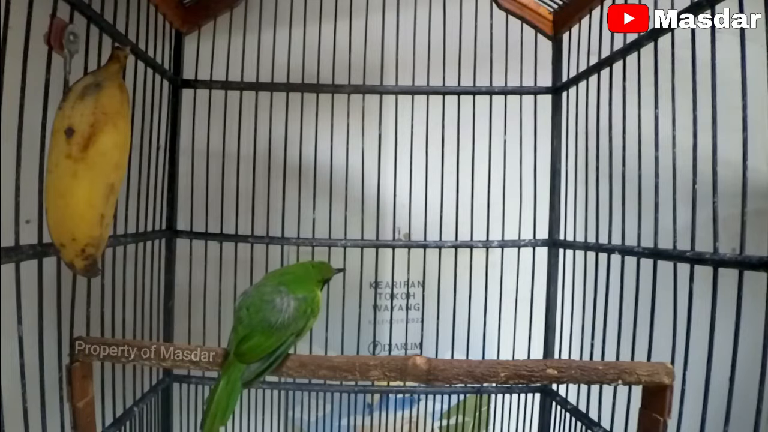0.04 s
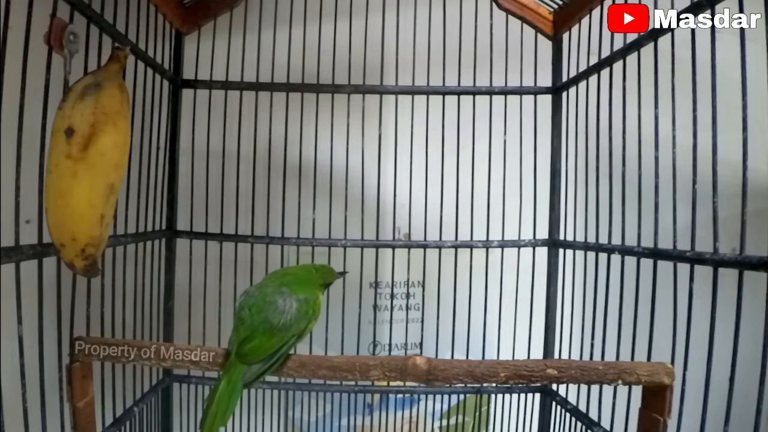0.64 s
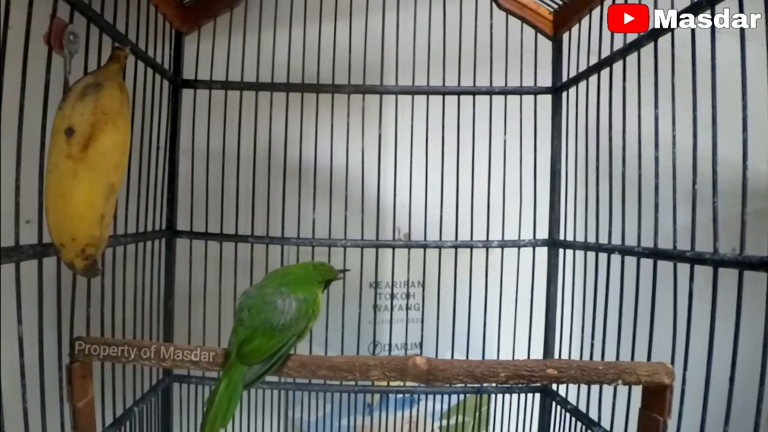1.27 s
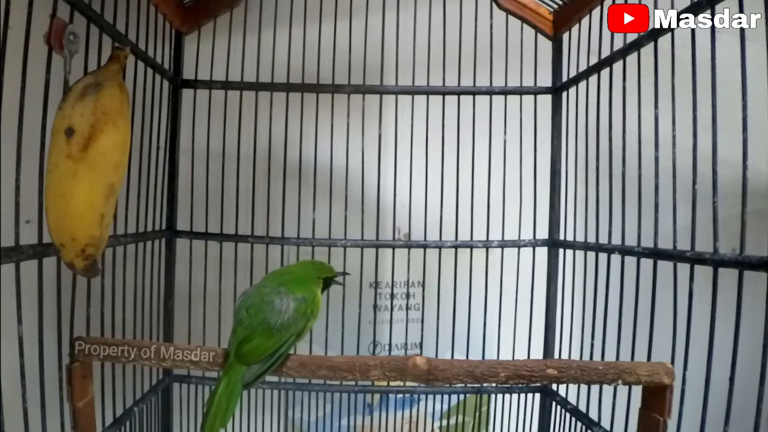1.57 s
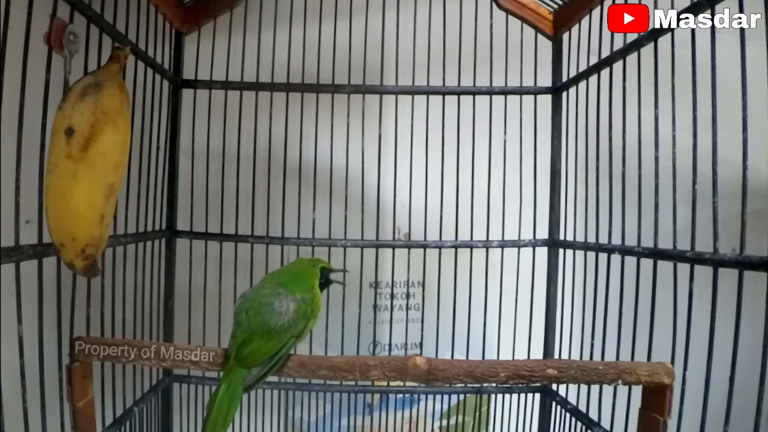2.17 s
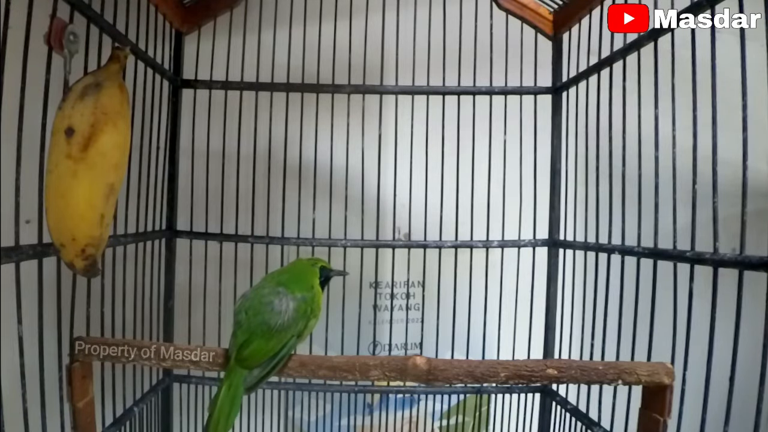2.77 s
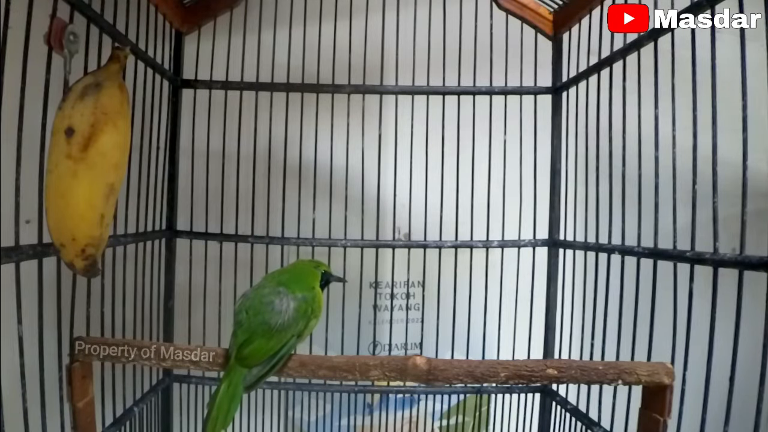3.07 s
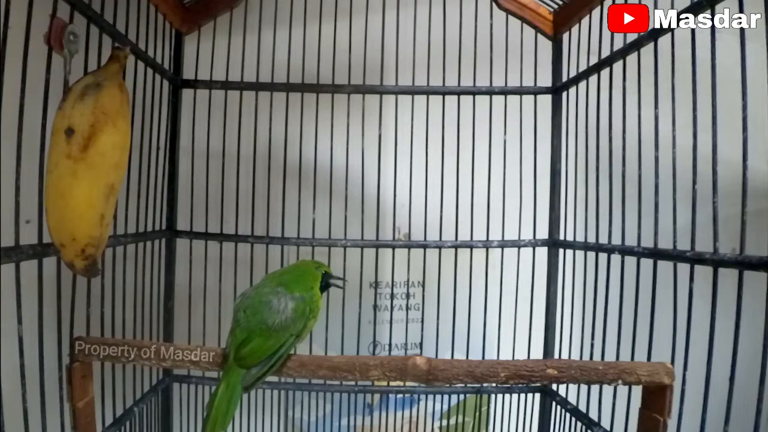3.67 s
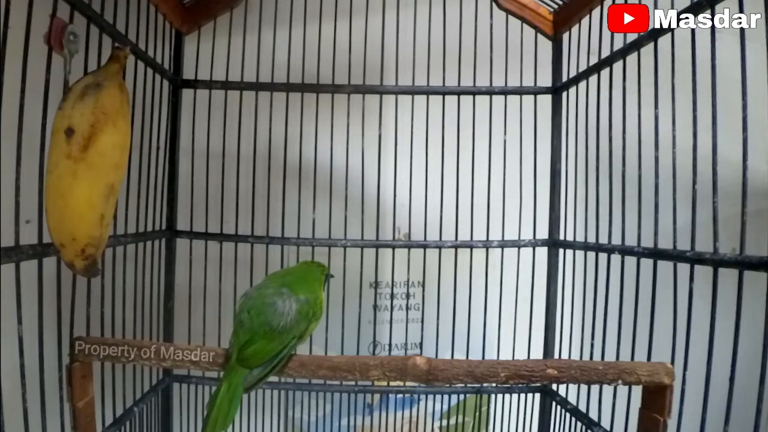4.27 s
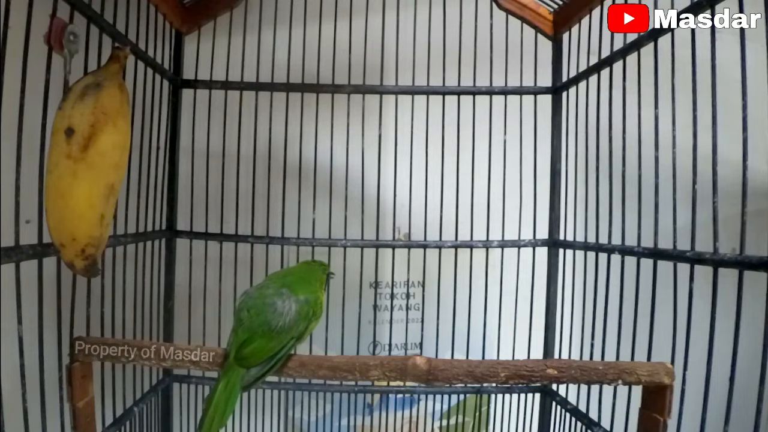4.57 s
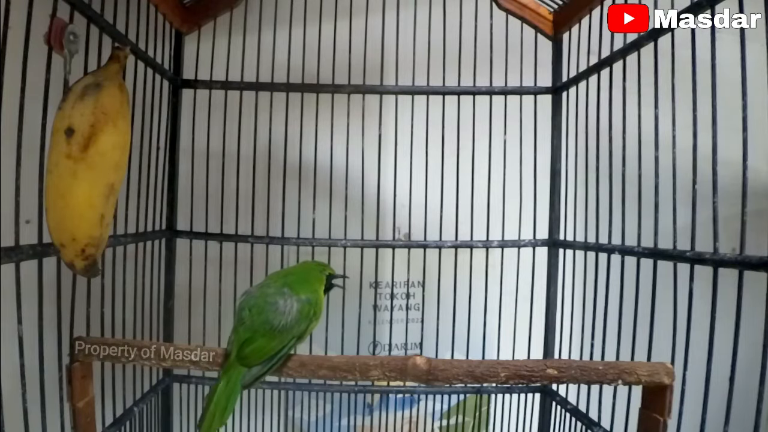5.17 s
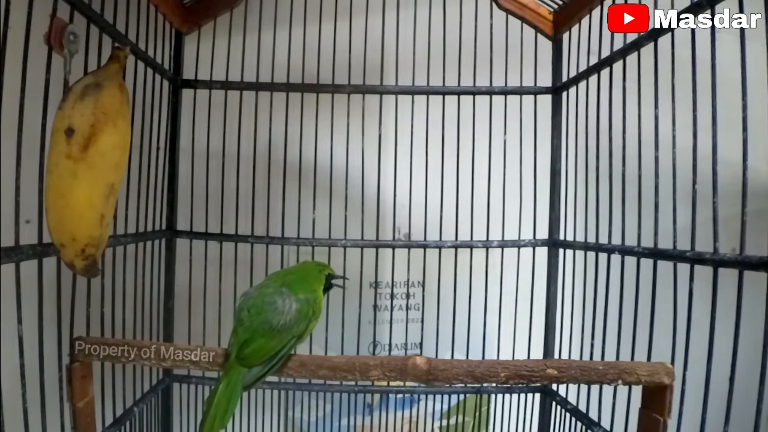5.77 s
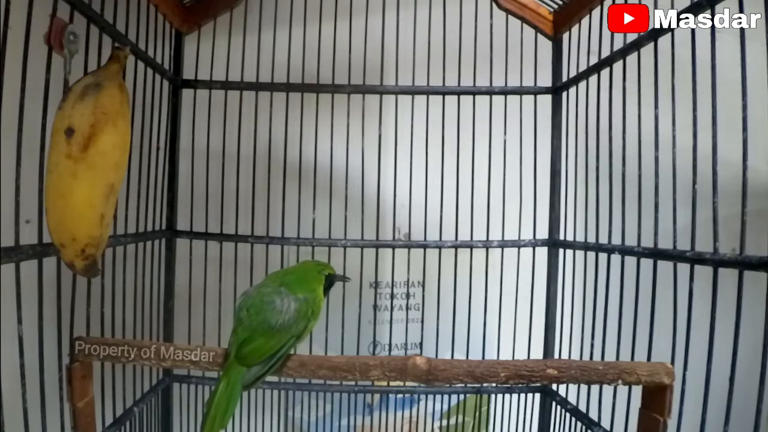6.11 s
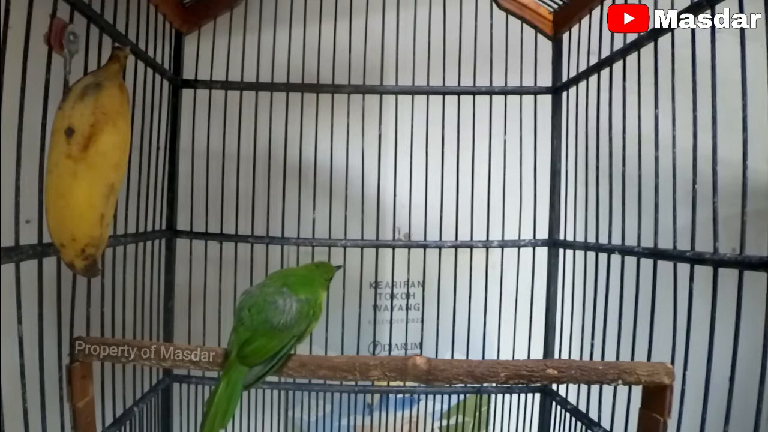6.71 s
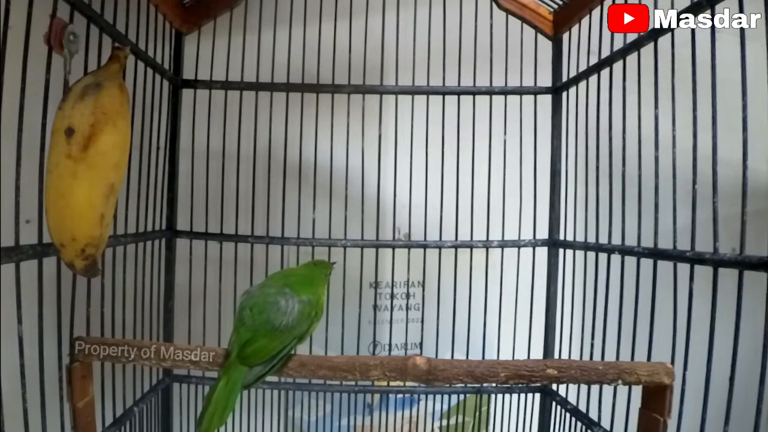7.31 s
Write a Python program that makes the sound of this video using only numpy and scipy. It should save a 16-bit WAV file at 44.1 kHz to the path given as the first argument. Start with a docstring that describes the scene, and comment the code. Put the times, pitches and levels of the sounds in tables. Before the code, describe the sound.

A songbird sings in a wire cage in a small, hard room, close to one microphone. It opens with quick upswept chips, short nasal notes and a run of harsh rasps as a soft hiss joins in. More chips lead to two brief sliding whistles and a thin whine. The rasps return, followed by darting chips and a few last rasps over a faint rustle. The background is very quiet.

```python
"""A leafbird sings in a wire cage in a small hard room, close to one microphone, over a faint rumble.
Its voice box (the syrinx) has two sides: one alone whistles, both together beat and sound harsh.
First come upswept chips, short nasal chits and harsh arched rasps, and a soft hiss joins in. More chips
lead to two sliding whistles and a thin whine. Rasps return, then two-sided chips, then last rasps over
a faint rustle. Throughout, the recorder's noise suppressor turns down whatever is quiet."""
import sys
import numpy as np
from scipy import signal
from scipy.fft import rfft, irfft, next_fast_len
from scipy.io import wavfile
from scipy.ndimage import uniform_filter1d, minimum_filter1d

SR = 44100
rng = np.random.default_rng(int(sys.argv[2]) if len(sys.argv) > 2 else 0)


def transcribe(signal):
    """Save signal, clipped to [-1, 1], as a 16-bit WAV file at the path in sys.argv[1]."""
    frames = np.atleast_2d(signal).T
    limited = np.clip(frames, -1, 1)
    pcm = np.round(limited * 32767).astype(np.int16)
    wavfile.write(sys.argv[1], SR, pcm)


N = 328545
TOP_HZ = 15500  # upper edge of the sound


def amp(db):
    """Turn decibels into a number to multiply by."""
    return 10 ** (np.asarray(db) / 20)


def unit(x):
    """Scale a sound to an average strength (rms) of 1."""
    return x / np.sqrt(np.mean(x ** 2) + 1e-20)


def along(points, hz):
    """Read between (frequency, value) points on a log frequency axis."""
    freqs, values = np.transpose(points)
    return np.interp(np.log(hz + 1), np.log(freqs + 1), values)


def curves(rows):
    """An on/off gate over the rows' time span, with 10 ms fades, then a curve for each further column."""
    times, *columns = np.transpose(rows)
    t = np.arange(N) / SR
    gate = np.clip(np.minimum(t - times[0], times[-1] - t) / .01 + 1, 0, 1)
    return [gate] + [np.interp(t, times, column) for column in columns]


def wobble(rate, n):
    """A random curve of n samples that heads for a new value `rate` times a second."""
    return np.interp(np.arange(n) * rate / SR, np.arange(8192), rng.standard_normal(8192))


def filtered(x, response):
    """Turn each frequency of x up or down by response(hz)."""
    size = next_fast_len(len(x) + SR // 10)
    hz = np.fft.rfftfreq(size, 1 / SR)
    return irfft(rfft(x, size) * response(hz), size)[:len(x)]


def noise(spectrum, n=N):
    """Noise of strength 1, coloured by (frequency, level) points."""
    white = rng.standard_normal(max(n, SR // 4))[:n]
    return unit(filtered(white, lambda hz: amp(along(spectrum, hz))))


def phase(hz):
    """How far a vibration has turned, in radians, as it follows a pitch curve."""
    return 2 * np.pi * np.cumsum(hz) / SR


def add(track, s, sound):
    """Mix a sound into the track at s seconds."""
    part = track[max(round(s * SR), 0):][:len(sound)]
    part += sound[:len(part)]


def in_room(x, wall_db, tail_db):
    """Echoes off near walls and a fading tail, new for each note, as when the bird turns its head."""
    # how long the room rings: (frequency [Hz], time to fade by 60 dB [s])
    ring_times = [(500, 0.1), (3000, 0.31), (6000, 0.25), (10000, 0.24), (15000, 0.22)]
    hz, t, bands = signal.stft(rng.standard_normal(SR // 3), SR, nperseg=256)
    fade = amp(-60 * t / along(ring_times, hz)[:, None])
    tail = signal.istft(bands * fade, SR, nperseg=256)[1]
    tail *= 1 - np.exp(-np.arange(len(tail)) / SR / 0.0034)
    echo = amp(tail_db) * tail / np.linalg.norm(tail)
    delays_s = rng.uniform(0.0015, 0.013, size=8)
    echo[(delays_s * SR).astype(int)] += amp(wall_db) * rng.choice([-1, 1], size=8)
    echo[0] += 1  # the direct sound
    return signal.fftconvolve(x, echo)


def gesture(length, top_hz, start, end, turn, swell, bend=1.7, attack_power=0.84, release_power=0.32):
    """One note's pitch arch and swell of air pressure; start and end are shares of the top pitch."""
    progress = np.linspace(0, 1, max(int(length * SR), 64))
    turn, swell = np.clip([turn, swell], .05, .9)  # where pitch and pressure peak
    rise = np.clip(1 - progress / turn, 0, .9)  # the pitch slides only once the note has caught
    fall = (progress - turn) / (1 - turn)
    pitch = top_hz * (1 + np.where(progress < turn, (start - 1) * rise ** bend, (end - 1) * fall ** 2))
    hump = np.abs(np.sin(np.pi * np.interp(progress, [0, swell, 1], [0, .5, 1])))
    pressure = hump ** np.where(progress < swell, attack_power, release_power)
    # the vibration needs a moment to build up and to stop
    edges = np.tanh(np.minimum(progress, 1 - progress) * length / 0.00052) ** 2
    return pitch, pressure * edges


def room_rumble(rumble_db=-89):
    """The room's low rumble and faint, wavering hum."""
    # tones of the hum: (pitch [Hz], level [dB])
    hum_tones = [(86.1, -88), (134.6, -92.5), (172.3, -101)]
    # colour of the rumble: (frequency [Hz], relative level [dB])
    colour = [(15, -46.5), (25, -9.5), (81, 3), (134, -1.5), (156, -12), (224, -5.5), (281, -10),
              (500, -24.5), (650, -39), (1100, -120)]
    hum = sum(amp(db) * np.sin(phase(hz * (1 + 0.018 * wobble(20, N)))) for hz, db in hum_tones)
    return amp(rumble_db) * noise(colour) + hum


def harsh_note(s, pitch, pressure, beat_share, coupling, jitter, beat_jitter, tilt_db, air_db):
    """Both sides of the voice box sound at once; their beat adds extra tones around every harmonic."""
    # boost or cut of the lowest harmonic through the song: (time [s], gain [dB])
    lowest_gain = [(.55, 4), (.8, -2), (1.1, -2), (1.6, 4), (1.87, -4.5), (2.25, 4.5), (5.3, 3.5),
                   (6.1, -3.5), (7.2, -15)]
    # how throat and beak shape the voice: (frequency [Hz], gain [dB])
    throat = [(900, -64.5), (1600, -34), (2150, -24.5), (2700, -19), (3200, -28), (3700, -22), (4400, -4.5),
              (5400, 1.5), (6700, -0.5), (7500, -1.5), (8400, -11), (10000, -12.5), (13000, -25.5),
              (15500, -29)]
    # colour of air swirling in the throat: (frequency [Hz], relative level [dB])
    air_colour = [(1200, -47), (1900, -31.5), (2700, -17), (3200, -13), (3650, -43), (4700, -1.5),
                  (6500, 20), (8200, -18.5), (10000, -8.5), (13000, 1), (15500, -14)]
    n = len(pitch)
    # the coupled sides pull each other off pitch, so the beat stumbles
    cycle = phase(pitch * (1 + jitter * wobble(1300, n)))
    beat = np.exp(1j * phase(pitch * (beat_share + beat_jitter * wobble(900, n))))
    # the throat delays each harmonic's beat differently
    lags = np.exp(2j * np.pi * rng.random(size=6))
    harmonics = []
    for k, lag in enumerate(lags, 1):
        if k * pitch.mean() < TOP_HZ:
            pull = coupling * np.sqrt(k - .75) * beat * lag
            harmonics.append(amp(tilt_db * k) * unit(np.exp(1j * k * cycle + pull).real))
    flutter = unit(1 + 0.6 * wobble(600, n))
    harmonics[0] *= amp(np.interp(s, *np.transpose(lowest_gain))) * flutter
    voice = unit(filtered(sum(harmonics), lambda hz: amp(along(throat, hz))))
    puffs = noise(air_colour, n) * (1 + 1.4 * beat.real)  # air escapes in step with the beat
    unsteady = amp(1.3 * wobble(170, n))
    note = pressure * unsteady * (voice + amp(air_db) * coupling * puffs)
    return in_room(note, wall_db=-15.5, tail_db=-4.5)


def rasps(gain_db=3, hook=1.159):
    """Arched notes from two tightly coupled sides; a deeper arch is brighter, beats faster, ends lower."""
    # harsh notes: (time [s], length [s], top pitch [Hz], relative level [dB], arch depth [0-1],
    # loudest point [0-1], how hard the two sides pull on each other [factor])
    notes = [(0, 0.019, 2150, -29.5, 0.15, 0.3, 0.45), (0.545, 0.03, 2510, -9, 0.16, 1, 0.95),
             (1.107, 0.056, 2490, -18.5, 0.15, 0.33, 0.78), (1.254, 0.072, 2488, -16.5, 0.13, .66, 0.74),
             (1.409, 0.098, 2550, -15.5, 0.23, 0.65, 0.67), (1.585, 0.065, 2710, -9, 0.22, 0.65, 0.69),
             (1.712, .046, 2728, -17.5, .14, 0.37, 0.66), (1.759, .019, 2777, -13.5, .08, .46, 0.278),
             (1.866, 0.095, 2772, -15.5, 0.09, 0.21, 0.54), (2.002, 0.087, 2693, -15.5, 0.14, 0.72, 0.91),
             (2.137, 0.066, 2720, -13.5, .17, 0.5, 1.26), (2.284, 0.087, 2666, -19.5, 0.22, 0.68, 1.21),
             (3.645, 0.035, 4720, -17.5, 0.35, 0.21, 0.25), (5.237, 0.032, 3990, -15.5, 0.23, 0.67, 0.36),
             (5.308, 0.042, 3136, -11, 0.18, 0.98, 1.2), (5.394, 0.06, 2896, -14, 0.23, 0.28, 1.03),
             (5.507, 0.062, 2822, -11.5, .22, 0.63, 0.89), (5.633, 0.092, 2799, -15.5, 0.16, 0.73, 0.9),
             (5.794, 0.1, 2744, -18, 0.09, 0.47, 0.64), (5.956, .055, 2624, -15.5, 0.07, 0.65, .65),
             (6.101, 0.11, 2744, -17.5, .13, 0.39, 1.01), (7.186, 0.042, 3390, -14, 0.22, 0.94, 1.03),
             (7.276, 0.047, 2886, -11, 0.23, 0.59, 1.05), (7.389, 0.083, 2754, -18, 0.27, 0.49, 1.13)]
    song = np.zeros(N)
    for s, length, top_hz, db, depth, swell, coupling in notes:
        pitch, pressure = gesture(length, top_hz, start=1 - depth, end=1 - hook * depth, turn=.73,
                                  swell=swell, bend=1.3, attack_power=1.07, release_power=0.74)
        note = harsh_note(s, pitch, pressure, beat_share=.09 + 0.66 * depth, coupling=coupling,
                          jitter=0.011 * coupling, beat_jitter=.04 * coupling,
                          tilt_db=-3.5 + 9 * depth, air_db=-11.5)
        add(song, s, amp(db + gain_db) * note)
    return song


def whistle(s, pitch, pressure, jitter=0.012, third_db=-4, fourth_db=-17, buzz_db=3, low_cut_hz=650):
    """One side of the voice box alone: a nearly pure tone that gains overtones and a buzz when pressed."""
    # how hard the bird presses: (time [s], relative level of overtones and buzz [dB])
    effort = [(.25, -22.5), (2.45, -58.5), (2.78, -46), (3.7, -23), (3.85, -27.5), (3.95, -57),
              (6.3, -60.5), (7.05, -42)]
    n = len(pitch)
    cycle = phase(pitch * (1 + jitter * wobble(1000, n)))
    strain = amp(np.interp(s + np.arange(n) / SR, *np.transpose(effort)))
    overtones = np.sin(2 * cycle) + amp(third_db) * np.sin(3 * cycle) + amp(fourth_db) * np.sin(4 * cycle)
    buzz = amp(buzz_db) * (wobble(3000, n) * overtones + wobble(2600, n) * np.sin(cycle))
    tone = np.sin(cycle) + strain * (overtones + buzz) / 2
    note = filtered(pressure * tone, lambda hz: 1 / (1 + (low_cut_hz / (hz + 1)) ** 4))
    return in_room(note, wall_db=-14, tail_db=-5)


def chips(gain_db=4, attack_s=0.0082):
    """Tiny whistles that shoot up to their top pitch and sag a little at the end."""
    # single chips: (time [s], length [s], top pitch [Hz], relative level [dB])
    notes = [(.008, 0.022, 3480, -21), (0.054, 0.0081, 3840, -8), (0.089, 0.015, 3880, -9.5),
             (0.132, 0.009, 3980, -7.5), (0.169, 0.01, 3818, -9.5), (0.207, 0.016, 3445, -16.5),
             (0.2465, 0.011, 3710, -16.5), (2.439, 0.011, 3700, -37.5), (2.475, 0.021, 3540, -12),
             (2.517, 0.0053, 3620, -15.5), (2.557, 0.0086, 3650, -14.5), (2.595, 0.017, 3918, -11),
             (2.64, 0.013, 4290, -24), (2.766, 0.0095, 3560, -13), (2.777, 0.038, 4425, -12),
             (3.785, 0.021, 4060, -12), (3.807, 0.019, 4390, -10.5)]
    song = np.zeros(N)
    for s, length, top_hz, db in notes:
        pitch, pressure = gesture(length, top_hz, start=.79, end=0.85, turn=.6, swell=attack_s / length,
                                  bend=2.1, attack_power=0.82, release_power=0.47)
        add(song, s, amp(db + gain_db) * whistle(s, pitch, pressure))
    return song


def chits(gain_db=2.5):
    """Short, bright, slightly falling notes with the two sides loosely coupled."""
    # nasal notes: (time [s], length [s], top pitch [Hz], relative level [dB])
    notes = [(0.479, 0.034, 2407, -15.5), (0.63, 0.034, 2307, -14), (0.765, 0.036, 2273, -18.5),
             (.846, 0.033, 2251, -17), (0.932, .034, 2238, -16.5), (1.02, 0.032, 2193, -15)]
    song = np.zeros(N)
    for s, length, top_hz, db in notes:
        pitch, pressure = gesture(length, top_hz, start=.92, end=.87, turn=0.34, swell=0.5,
                                  attack_power=1.4, release_power=0.48)
        note = harsh_note(s, pitch, pressure, beat_share=.4, coupling=0.42, jitter=.012,
                          beat_jitter=0.0636, tilt_db=0.6, air_db=-12)
        add(song, s, amp(db + gain_db) * note)
    return song


def hiss(width_hz=390, steepness=7, low_cut_hz=800):
    """A soft hiss under and between the phrases: one band of noise that wanders up and down."""
    # one list for each stretch of hiss: (time [s], level [dB], centre of the band [Hz])
    stretches = [
        [(0.98, -78, 1870), (1.066, -44.5, 1891), (1.262, -71, 1770), (1.302, -50.5, 1628),
         (1.364, -63.5, 1850), (1.594, -71, 1850), (1.66, -50.5, 1788), (1.85, -105, 1590)],
        [(1.85, -90, 1590), (1.926, -57, 1368), (2.0, -70, 1380), (2.19, -50.5, 1738), (2.27, -70, 1757),
         (2.348, -52, 1650), (2.62, -52.5, 1643), (2.72, -73.5, 1530)],
        [(2.72, -67.5, 1510), (2.812, -40.5, 1440), (3.176, -38, 1503), (3.292, -40, 1113),
         (3.438, -38.5, 1348), (3.672, -75, 1220), (3.734, -50, 1290), (4.1, -80.5, 1080)],
        [(4.42, -80.5, 1634), (4.53, -51.5, 1737), (4.608, -51, 1906), (4.782, -43.5, 1570), (4.94, -44, 1880),
         (4.958, -39, 1850), (5.158, -58, 1280), (5.22, -78.5, 1110)],
    ]
    track = np.zeros(N)
    for rows in stretches:
        gate, db, centre_hz = curves(rows)
        low_noise = filtered(rng.standard_normal(N),
                             lambda hz: 1 / np.sqrt(1 + (hz / width_hz) ** steepness))
        # move the low noise up so that it sits around the centre frequency
        cycle = phase(centre_hz)
        band = unit(low_noise * np.cos(cycle) + np.roll(low_noise, SR) * np.sin(cycle))
        track += gate * amp(db + 1.3 * wobble(40, N)) * band
    return filtered(track, lambda hz: 1 / (1 + (low_cut_hz / (hz + 1)) ** 8))


def sliding_whistles(gain_db=3):
    """A rising whistle, then a held one that flicks up and falls away."""
    # one list for each whistle: (time [s], pitch [Hz], relative level [dB])
    slides = [
        [(3.692, 3150, -27), (3.713, 3720, -7.5), (3.724, 4050, -11.5), (3.731, 4750, -16)],
        [(3.829, 4450, -11.5), (3.853, 4720, -8.5), (3.861, 4750, -26), (3.874, 5080, -18.5),
         (3.886, 4850, -32), (3.953, 4600, -27.5), (3.974, 3300, -22.5), (3.998, 2600, -25), (4.012, 2420, -42)],
    ]
    song = np.zeros(N)
    for rows in slides:
        gate, pitch, db = curves(rows)
        pressure = gate ** 4 * amp(db + gain_db)
        sounding = np.flatnonzero(gate)
        s = sounding[0] / SR
        add(song, s, whistle(s, pitch[sounding], pressure[sounding]))
    return song


def whine(jitter=0.0145, gain_db=0.5):
    """A thin nasal note of six harmonics that starts bright and mellows as it sinks."""
    # path of the whine: (time [s], pitch [Hz], relative levels of harmonics 1, 2 and 3 [dB])
    path = [(4.525, 1683, -67, -58.5, -41.5), (4.543, 2037, -47, -29.5, -23),
            (4.577, 2155, -36.5, -49, -42.5), (4.635, 2226, -48, -50, -48), (4.681, 2133, -45, -25.5, -46),
            (4.709, 2069, -37, -42.5, -67), (4.785, 2126, -43, -42, -62), (4.941, 1946, -32.5, -97, -100),
            (4.965, 1854, -42, -108, -89)]
    gate, pitch, first_db, second_db, third_db = curves(path)
    cycle = phase(pitch * (1 + jitter * wobble(400, N)))
    levels_db = [first_db, second_db, third_db, third_db - 30, third_db - 9, third_db - 22]
    tone = sum(amp(db + gain_db) * np.sin(k * cycle) for k, db in enumerate(levels_db, 1))
    return in_room(gate ** 4 * tone, wall_db=-15, tail_db=-6.5)[:N]


def double_chips(gain_db=4, overlap_s=0.0033, turn=0.818, swell=0.64):
    """One side darts up first, louder the longer its lead; the other follows with a wide upsweep."""
    # two-sided chips: (time [s], length [s], top pitch [Hz], relative level [dB], lead [s],
    # top pitch of the leading side [Hz])
    notes = [(6.251, 0.017, 3783, -12.5, 0.014, 3606), (6.317, 0.026, 3403, -17, 0.011, 3320),
             (6.387, 0.015, 3540, -14, .012, 3190), (6.478, 0.039, 3544, -18, 0.0041, 3000),
             (6.555, .017, 3603, -17.5, 0.016, 3215), (6.613, 0.014, 3674, -17, .011, 3390),
             (6.772, 0.014, 3366, -19, 0.0066, 3910), (6.84, .018, 3390, -14, 0.012, 3080),
             (6.924, 0.017, 3647, -11, 0.00068, 4320), (7.044, .013, 3130, -20.5, 0.006, 4720)]
    song = np.zeros(N)
    for s, length, top_hz, db, lead_s, lead_hz in notes:
        leader = gesture(lead_s + overlap_s, lead_hz, start=.74, end=1, turn=turn, swell=swell)
        follower = gesture(length, top_hz, start=0.63, end=0.95, turn=turn, swell=swell)
        lead_db = -16 + 1050 * lead_s
        add(song, s - lead_s, amp(db + gain_db + lead_db) * whistle(s, *leader))
        add(song, s, amp(db + gain_db) * whistle(s, *follower))
    return song


def rustle():
    """A soft, uneven rustle of noise under the last phrase."""
    # how the rustle swells: (time [s], level [dB])
    loudness = [(7.1, -72), (7.162, -73), (7.218, -50), (7.332, -42.5), (7.398, -51.5), (7.45, -35)]
    # colour of the rustle: (frequency [Hz], relative level [dB])
    colour = [(24, -61), (40, -28), (325, -18.5), (391, -20.5), (727, -7), (791, -9), (1470, 0.5),
              (2200, -17), (2860, -66.5), (4840, -120)]
    gate, db = curves(loudness)
    return gate * amp(db + 1.8 * wobble(50, N)) * noise(colour)


def scene():
    """Everything reaches one microphone, so both channels are the same."""
    bird = chits() + rasps() + chips() + double_chips() + sliding_whistles() + whine()
    mono = bird + hiss() + room_rumble() + rustle()
    return np.array([mono, mono])


def record(dry, ceiling=.95):
    """A noise suppressor turns down weak bands, a limiter holds the peaks, the highest treble is cut."""
    # bands weaker than this are turned down: (frequency [Hz], level [dB])
    threshold = [(100, -118), (600, -102), (2000, -81), (3500, -66.0), (6000, -71.5), (14000, -95.0)]
    hz, _, bands = signal.stft(dry[0], SR, nperseg=512)
    power = np.abs(uniform_filter1d(np.abs(bands) ** 2, size=5, axis=0))
    band_gain = power / (power + amp(along(threshold, hz))[:, None] ** 2)
    cleaned = signal.istft(bands * band_gain, SR, nperseg=512)[1][:N]
    safe_gain = np.minimum(1, ceiling / (np.abs(cleaned) + 1e-9))
    held_gain = minimum_filter1d(safe_gain, size=181)
    smooth_gain = uniform_filter1d(uniform_filter1d(held_gain, size=91), size=91)
    mono = filtered(cleaned * smooth_gain, lambda hz: 1 / (1 + (hz / TOP_HZ) ** 160))
    return np.array([mono, mono])


dry = scene()
out = record(dry)
transcribe(out)
```